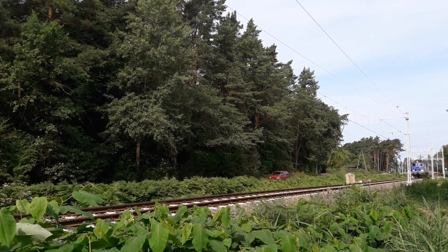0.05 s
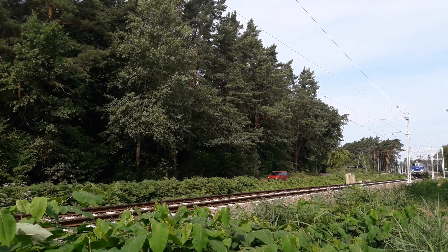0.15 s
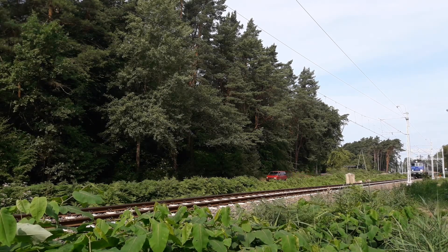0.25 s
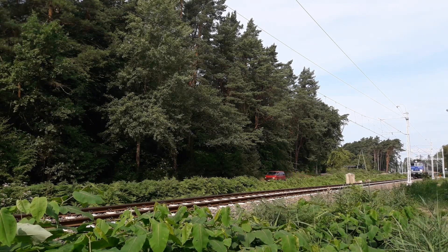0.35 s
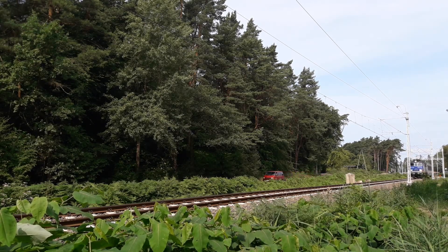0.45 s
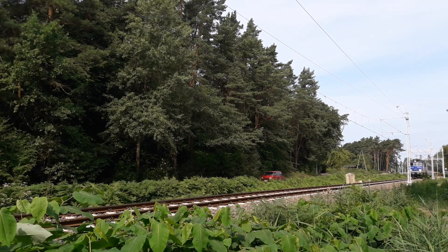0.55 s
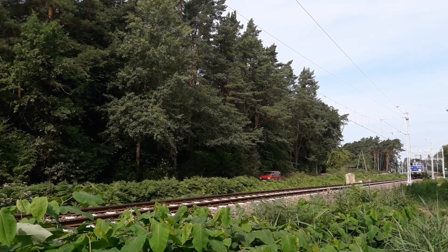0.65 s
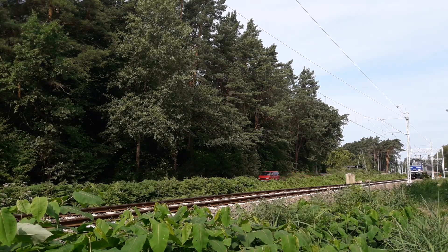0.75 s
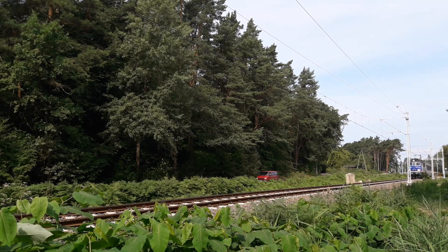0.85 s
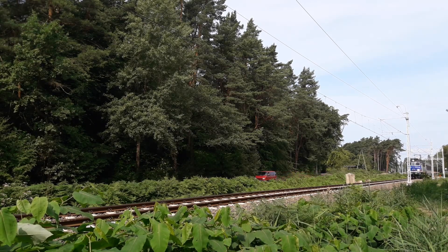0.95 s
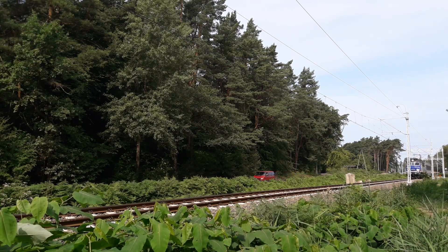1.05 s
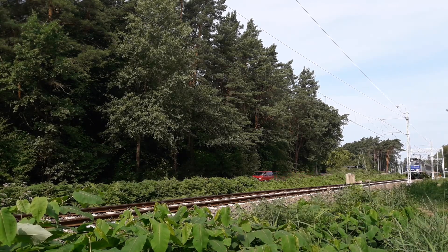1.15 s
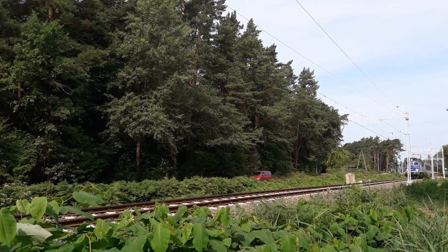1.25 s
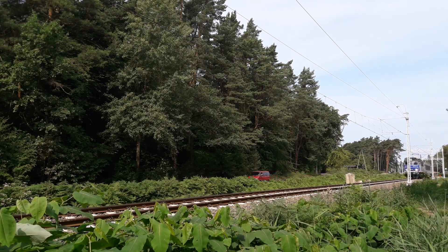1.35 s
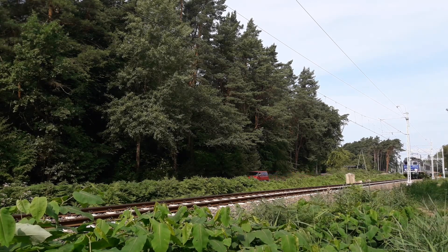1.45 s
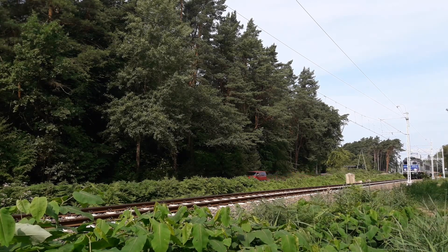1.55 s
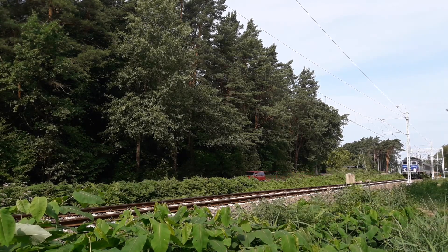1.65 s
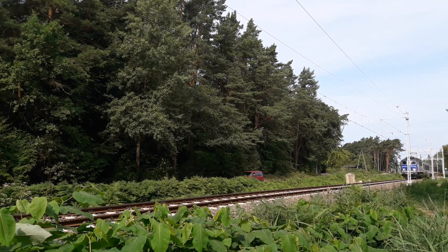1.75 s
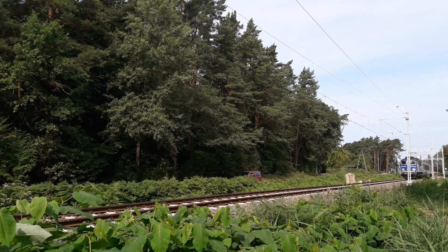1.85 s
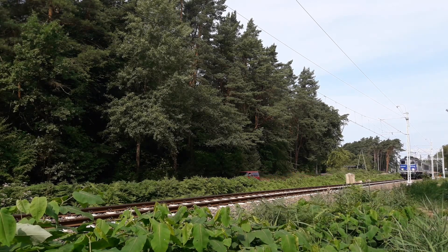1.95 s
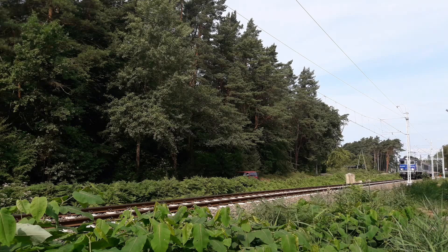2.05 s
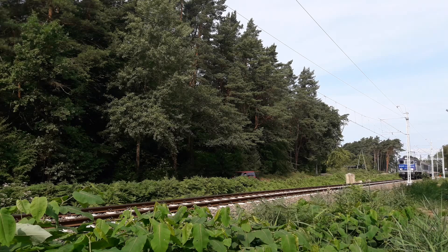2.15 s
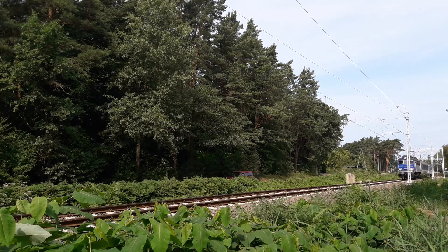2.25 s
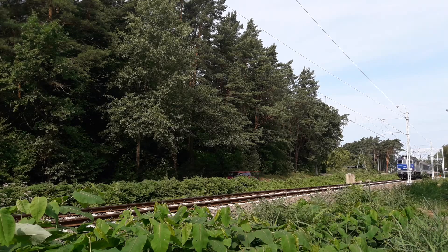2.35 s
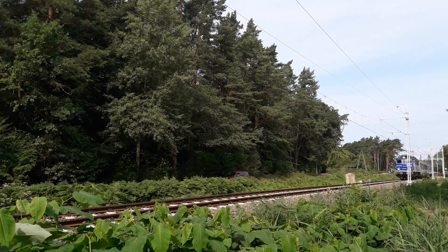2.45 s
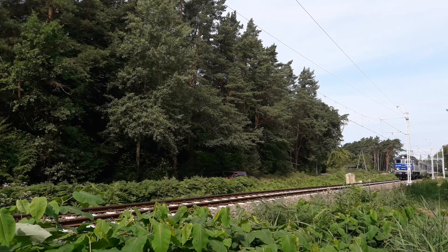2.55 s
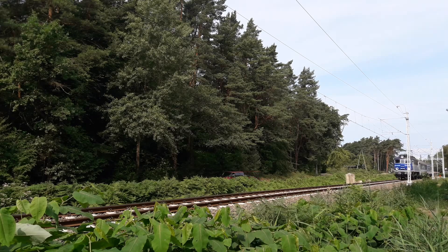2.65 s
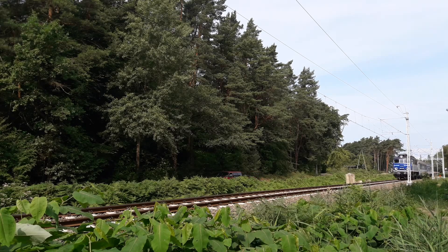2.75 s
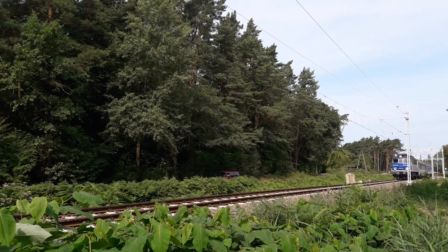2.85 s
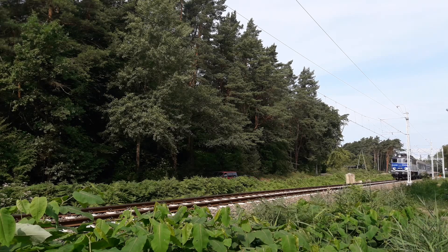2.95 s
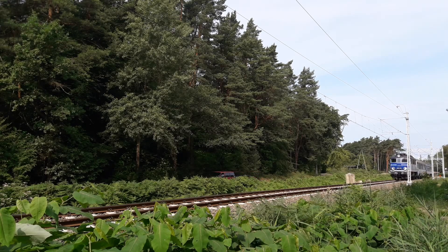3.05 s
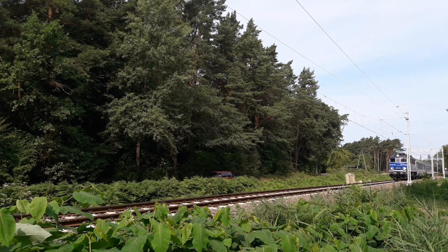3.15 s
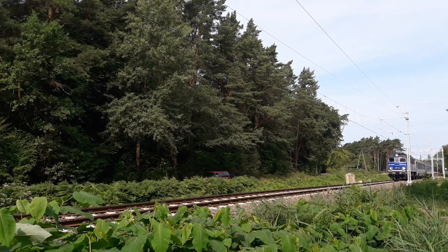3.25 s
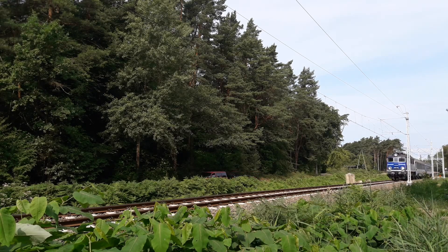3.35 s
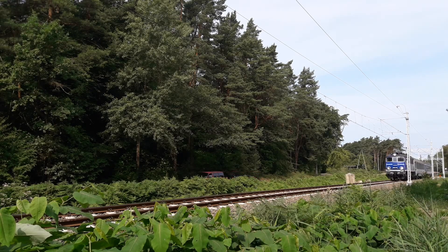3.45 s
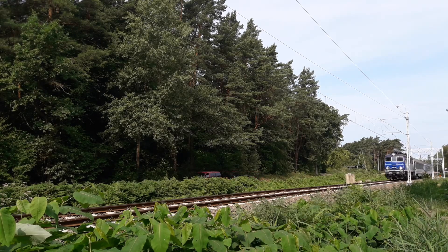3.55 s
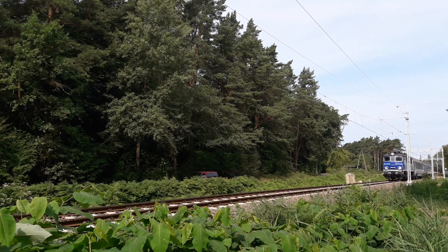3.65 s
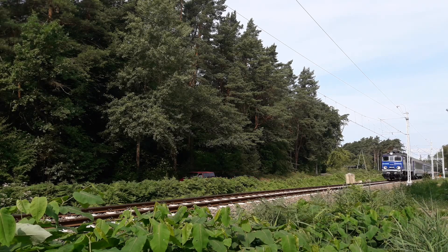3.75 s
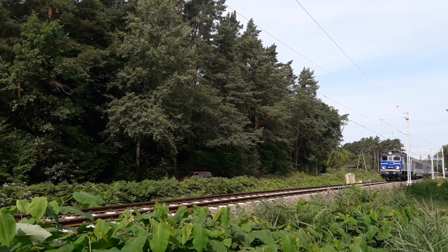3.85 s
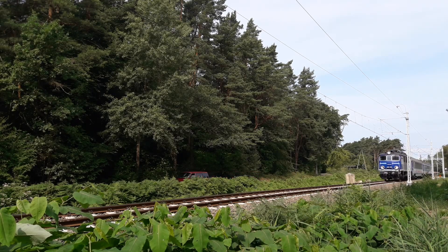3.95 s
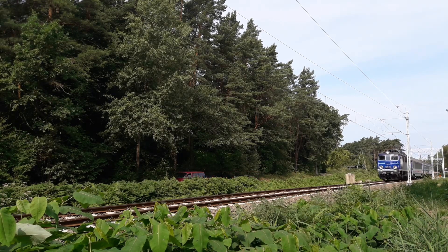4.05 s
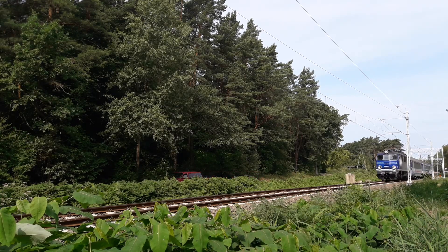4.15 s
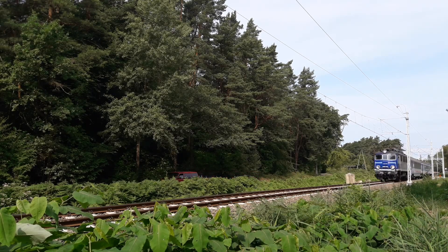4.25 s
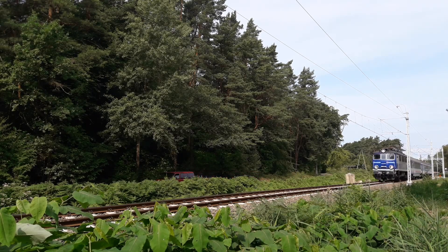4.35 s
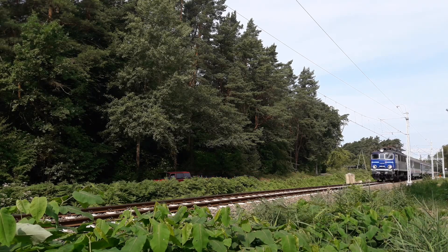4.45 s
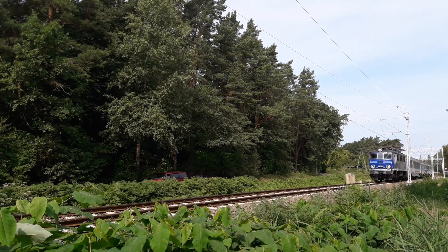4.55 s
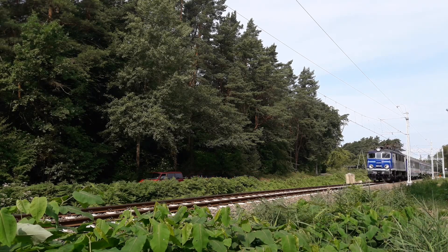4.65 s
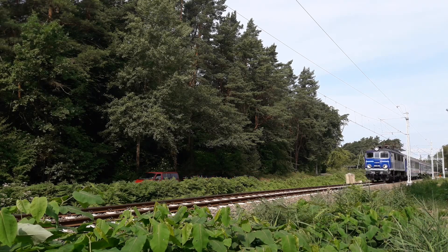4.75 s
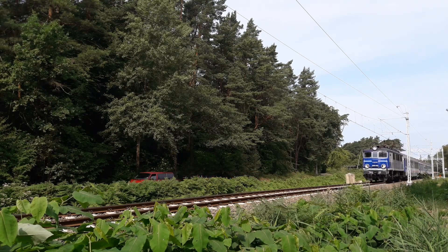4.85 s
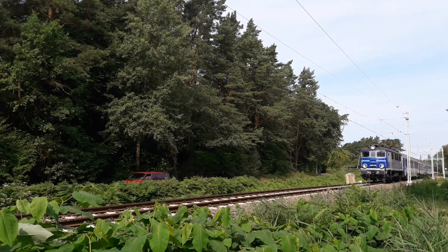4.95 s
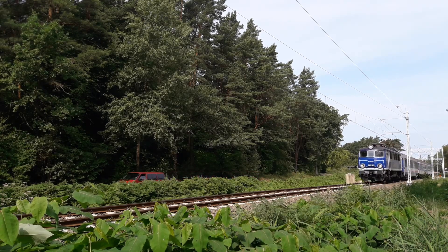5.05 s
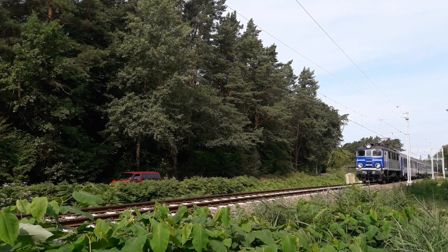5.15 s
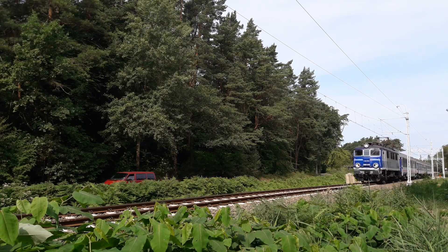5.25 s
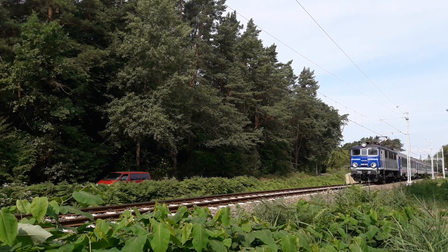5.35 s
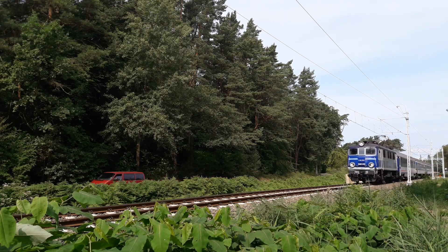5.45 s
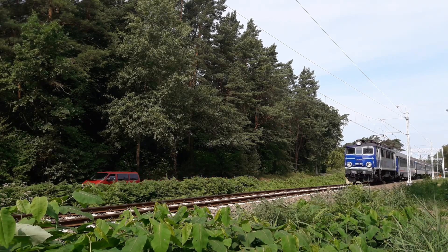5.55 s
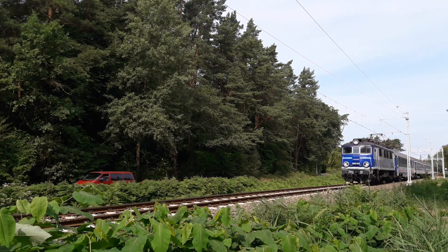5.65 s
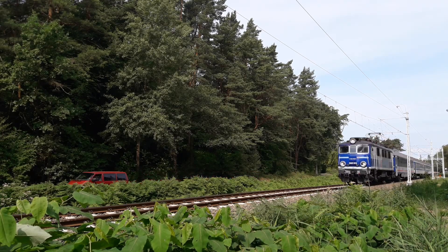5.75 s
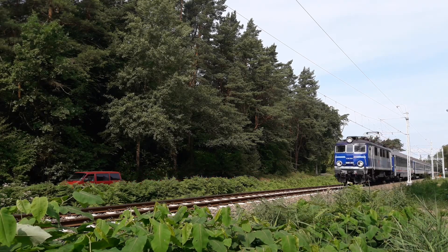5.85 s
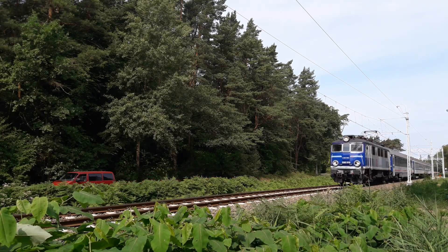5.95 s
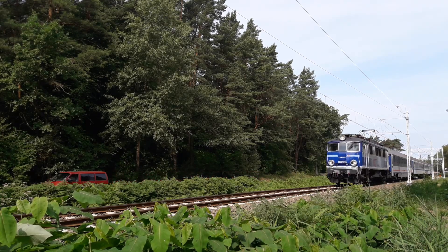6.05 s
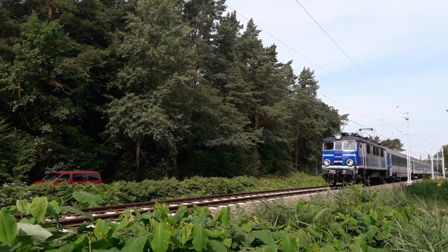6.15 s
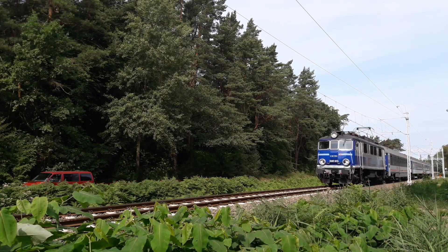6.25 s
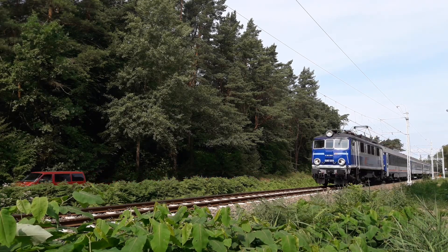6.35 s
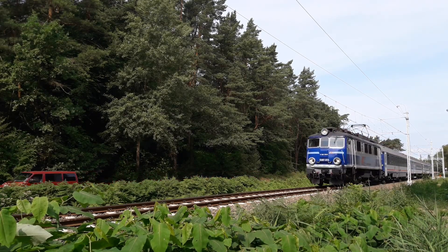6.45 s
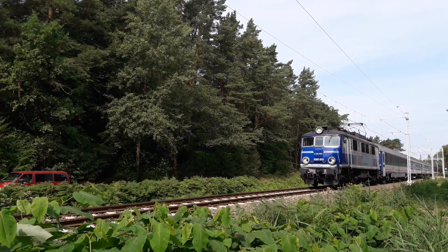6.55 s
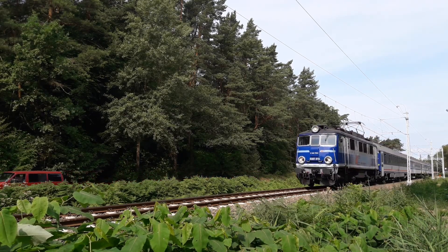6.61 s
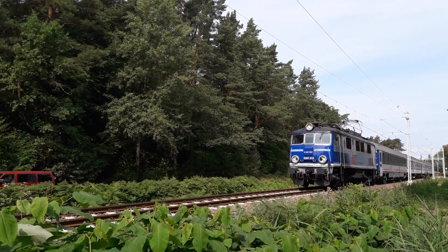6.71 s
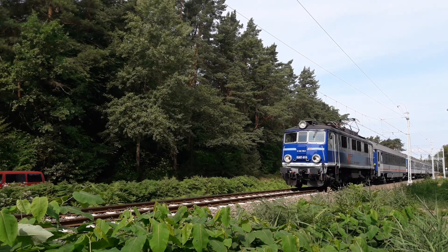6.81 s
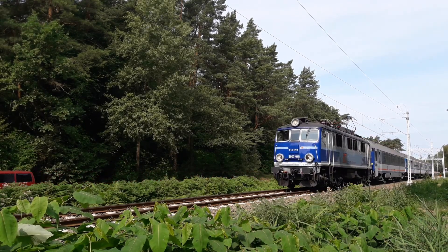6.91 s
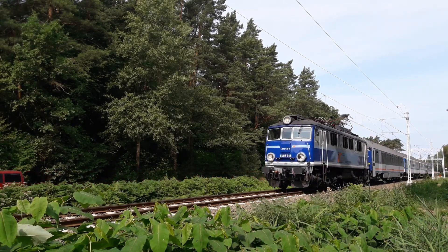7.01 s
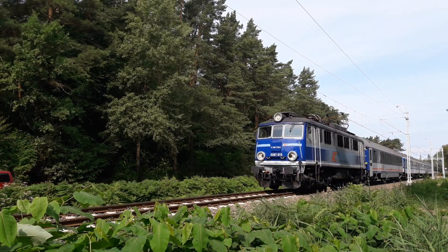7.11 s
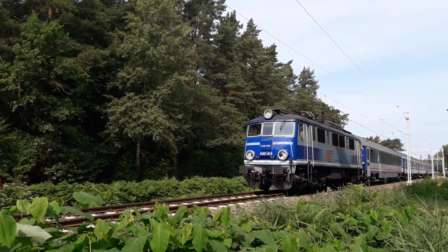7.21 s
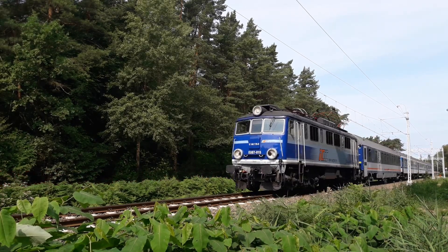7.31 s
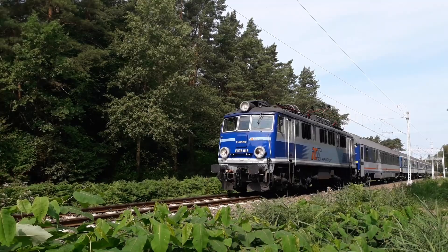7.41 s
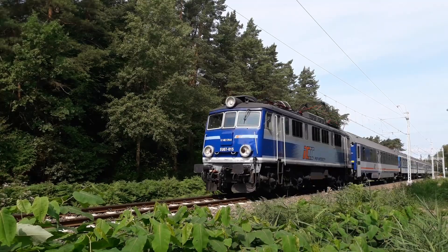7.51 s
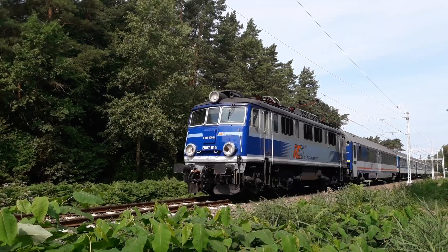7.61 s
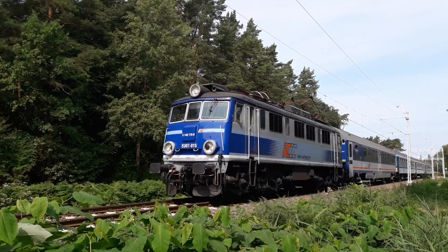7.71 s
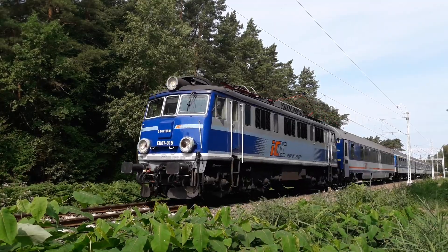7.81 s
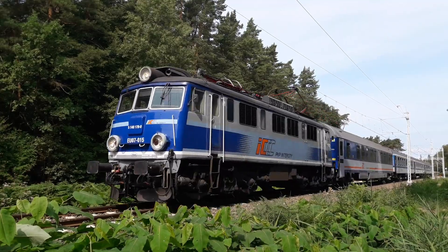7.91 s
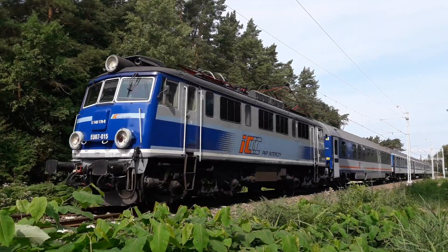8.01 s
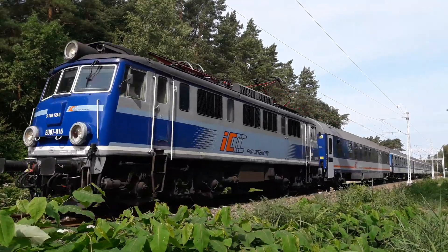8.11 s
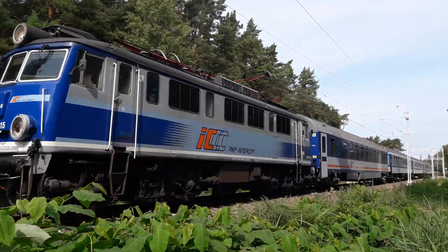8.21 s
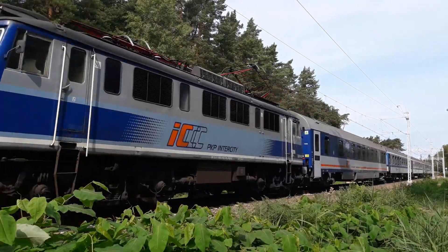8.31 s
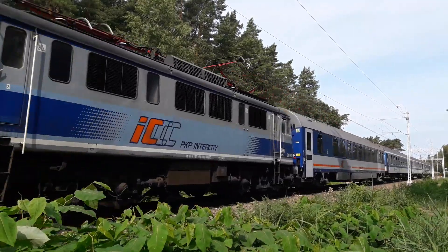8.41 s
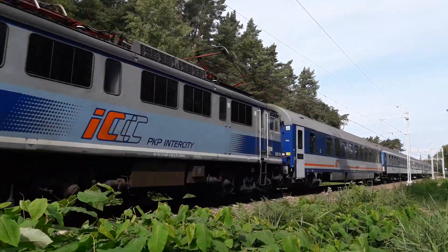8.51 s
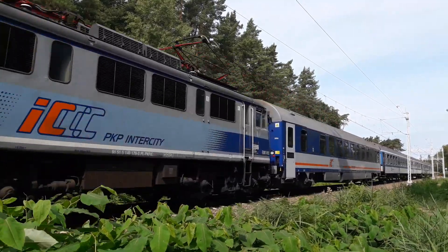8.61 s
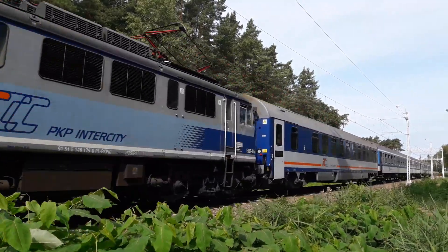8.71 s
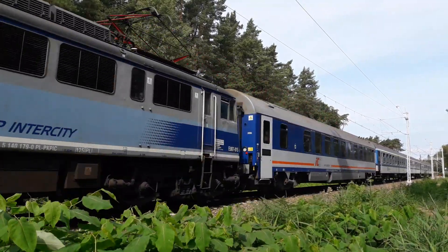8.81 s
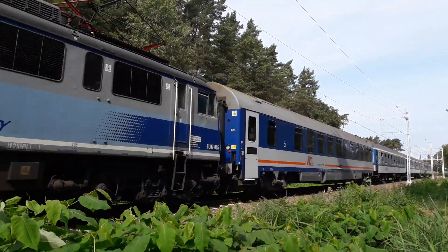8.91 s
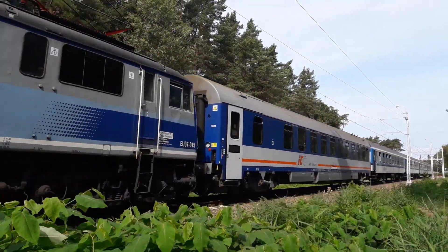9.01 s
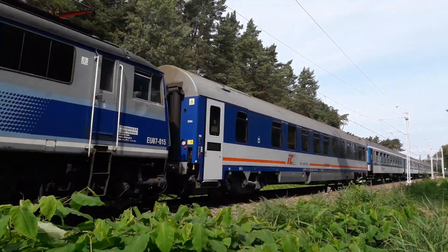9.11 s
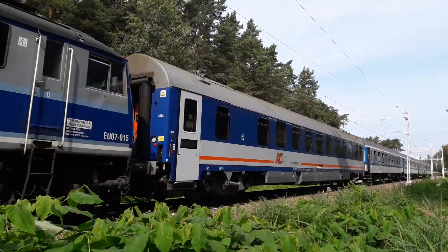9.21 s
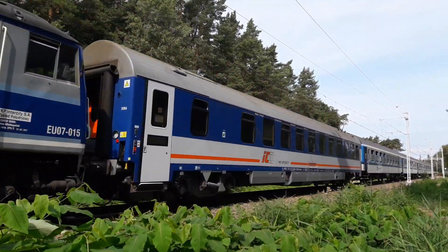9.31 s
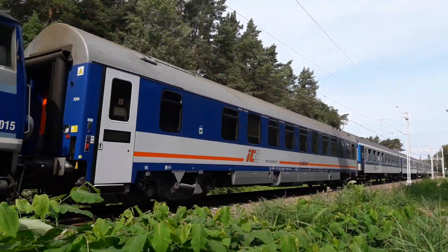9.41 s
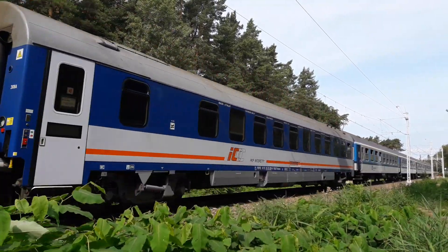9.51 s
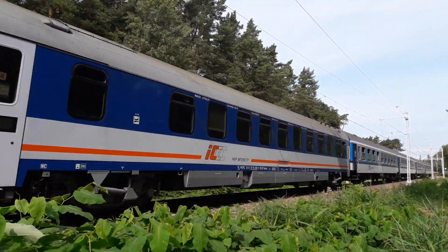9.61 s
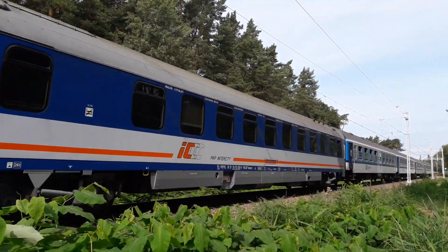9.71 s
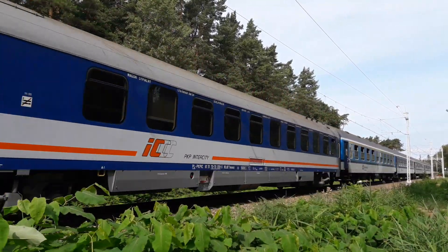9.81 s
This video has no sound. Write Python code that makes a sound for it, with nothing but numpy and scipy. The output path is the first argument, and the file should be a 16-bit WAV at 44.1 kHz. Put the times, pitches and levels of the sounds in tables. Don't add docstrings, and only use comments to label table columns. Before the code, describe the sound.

An electric train approaches along a forest line, from faint ringing rails to a loud roar of wheels, whining gears and hissing cooling air.

```python
import sys
import numpy as np
from scipy import signal
from scipy.fft import rfft, irfft, next_fast_len
from scipy.io import wavfile
from scipy.ndimage import map_coordinates

SR = 44100
rng = np.random.default_rng(int(sys.argv[2]) if len(sys.argv) > 2 else 0)


def boost(x):
    u = np.asarray(x, float) / 20
    return 10 ** u


def bounce(signal):
    frames = np.transpose(np.atleast_2d(signal))
    limited = np.clip(frames, -1, 1)
    pcm = np.round(limited * 32767).astype(np.int16)
    wavfile.write(sys.argv[1], SR, pcm)


N = 435266

# frequency in Hz, level in dB per Hz.
FOREST_SPECTRUM = [(20, -26), (35, -3), (50, 5), (70, -4), (110, -17), (200, -30)]
# frequency in Hz, level in dB per Hz.
PREAMP_SPECTRUM = [(5000, -13), (8000, -0.5), (10500, 0), (12000, 7), (15600, 6)]
# frequency in Hz, level in dB per Hz.
RUMBLE_SPECTRUM = [(26, -61), (36, -43), (44, -22), (52, -10.5), (75, -6), (104, 1.5), (135, -4), (175, -2),
                   (205, -19.5), (280, -23)]
# frequency in Hz, level in dB per Hz.
BOOM_SPECTRUM = [(120, -13.5), (190, 1.5), (270, 4), (340, 3.5), (400, 0), (440, -2.5), (540, 2),
                 (680, -5.5), (1000, -36)]
# frequency in Hz, level in dB per Hz.
ROAR_SPECTRUM = [(380, 3), (600, 1), (850, 2), (1060, 0.5), (1400, -2), (1900, -2.5), (2400, -12),
                 (3200, -53)]
# frequency in Hz, level in dB per Hz.
HISS_SPECTRUM = [(1500, -24), (2400, 3.5), (2950, 3.5), (3600, 0), (4500, -1), (5000, -6.5), (5600, -7.5),
                 (6300, -8.5), (7200, -12), (7700, -24), (8300, -30), (9500, -50)]
# frequency in Hz, level in dB per Hz.
SIZZLE_SPECTRUM = [(7600, -21), (8400, -1.5), (9300, 3), (10500, 2), (11500, 0.5), (12300, 0),
                   (13500, -2.5), (15600, -5)]

# time in seconds, wheels in dB, locomotive body in dB.
APPROACH = [(0, -25.5, -27.5), (.6, -26.5, -27), (1.8, -24, -25), (3, -22, -22.5), (4.2, -18.5, -19.5),
            (5.4, -14.5, -16), (6.2, -12.5, -13), (7, -9.5, -9.5), (7.5, -6.5, -6.5), (8, -2.5, -2),
            (8.3, -2.5, 0), (8.9, -1.5, 0), (9.3, 1, 0), (9.5, .3, -.6), (9.68, 0, -4.5), (9.87, 0.5, -4.5)]
# time in seconds, first dip in Hz, echo share from 0 to 1.
GROUND_ECHO = [(0, 2620, 0.16), (5.5, 2730, 0.13), (7, 3200, 0.33), (8, 2810, 0.53), (8.6, 2680, 0.63),
               (9.2, 2620, 0.51), (9.6, 2070, 0.3), (9.87, 1840, 0)]
# centre in seconds, spread in seconds, rumble in dB, boom in dB, roar in dB.
ROUGH_RAIL = [(3.05, 0.28, 5, 0.5, -0.5), (3.6, .06, 2, 2.5, 2), (5.38, .06, 1.5, -1.5, 0),
              (5.9, 0.071, 2.5, 2, 0.5), (6.42, .07, 1.5, 2, -1.5), (7.0, .07, 5, 2, 0),
              (7.55, .08, 2, 3.5, -0.5), (7.75, 0.12, 0, 1, -0.5), (8.35, 0.053, 2.5, -2, -0.5),
              (8.77, .05, -0.5, -0.5, 0), (9.15, 0.037, 0, -0.5, 1.5), (9.461, 0.074, 2.5, 1, 0.5),
              (9.75, 0.092, -0.5, 1.5, -1.5)]
# frequency in Hz, width in Hz, level in dB.
RAIL_RESONANCES = [(710, 134, -1), (766.5, 32, -9.5), (842.5, 71, -5.5), (952, 72, -5.5), (1144, 100, -7),
                   (1208, 44, -1.5), (1285, 38, -7.5), (1346, 74, -4), (552, 89, -10.5)]

# time in seconds, mesh pitch in Hz.
MESH_PITCH = [(0, 233), (2, 234.5), (3.7, 238.3), (5, 241.8), (6.3, 247), (7, 249), (7.7, 253), (8.2, 253),
              (8.6, 251), (9.1, 248), (9.4, 247), (9.87, 249)]
# time in seconds, first order in dB.
GEAR_EFFORT = [(0, -55), (1.5, -50), (3.1, -49.5), (3.4, -42.5), (4.5, -36), (5.3, -34.5), (5.75, -33),
               (6.3, -29.5), (7, -30.5), (7.5, -27), (8.1, -23), (8.3, -13.5), (8.8, -13), (9.1, -10.5),
               (9.3, -15.5), (9.65, -13.5), (9.87, -12)]
# multiple of the mesh pitch, peak in seconds, spread in seconds, level in dB.
HIGH_ORDERS = [(6, 8.24, 0.68, -33.5), (7, 8.32, 1, -33), (9, 7.2, 0.97, -45.5), (5, 19, 0.7, -50.5)]
# peak in seconds, spread in seconds, order, level in dB.
AXLES_IN_STEP = [(7.16, 0.025, 1, -23.5), (6.13, .04, 2, -34.5), (6.36, 0.026, 2, -32),
                 (7.07, 0.01, 2, -27), (7.77, 0.079, 2, -23.5), (8.03, 0.056, 2, -23), (8.38, .06, 2, -21),
                 (8.16, 0.035, 2, -22), (8.68, 0.055, 2, -21), (8.85, 0.054, 2, -23), (9.46, 0.013, 2, -15),
                 (9.6, 0.017, 2, -21.5), (7.82, 0.049, 3, -23.5), (8.21, 0.044, 3, -26),
                 (8.55, 0.043, 3, -30.5), (8.86, 0.082, 3, -29), (9.2, 0.076, 3, -33), (8.92, .05, 6, -29),
                 (9.76, 0.067, 6, -30)]
# centre in seconds, spread in seconds, order, depth from 0 to 1.
AXLES_OPPOSED = [(7.24, 0.022, 1, .9), (7.88, 0.02, 1, 0.6), (8.02, 0.014, 1, 0.4), (8.1, .02, 1, 0.9),
                 (8.85, 0.016, 1, 1), (9.2, .015, 1, .5), (9.27, .02, 1, 0.5), (9.36, 0.017, 1, 0.8),
                 (9.53, 0.047, 1, 0.54), (9.79, .025, 1, 0.86), (6.15, 0.023, 1, .8), (6.0, 0.019, 1, 0.5),
                 (5.8, 0.045, 1, 0.7), (6.84, 0.023, 1, .7), (7.93, 0.017, 2, 0.5), (8.94, .03, 2, 0.57),
                 (9.38, 0.024, 2, 0.3), (5.6, 0.052, 1, 0.5), (6.55, .03, 1, 0.3), (8.22, 0.018, 2, 0.66),
                 (8.49, 0.015, 2, 0.75), (8.6, 0.017, 2, 0.4), (9.64, .015, 2, 0.8)]

# peak in seconds, spread in seconds, frequency in Hz, width in Hz.
WHISTLES = [(6.95, .35, 404, 8), (9.57, .07, 330, 70), (9.15, .4, 880, 40), (9.2, .6, 1515, 45),
            (8.75, .2, 2850, 450), (9.45, .15, 2920, 300), (7.7, .3, 3790, 40), (9.75, .12, 2350, 350),
            (7.0, .7, 4500, 220), (8.45, .22, 4310, 90), (7.4, .3, 7300, 500), (6.2, .3, 6500, 1200),
            (7.3, .15, 11090, 300), (7.95, .2, 10500, 1100), (8.1, .17, 13240, 320), (7.85, .2, 14200, 900),
            (9.38, .1, 11600, 900), (8.8, .2, 12900, 500), (7.65, .17, 760, 260), (5.6, .6, 482, 22),
            (9.8, .08, 390, 120)]
WHISTLE_LEVELS = [-33, -20, -29, -26.5, -29.5, -30.5, -45, -31, -48.5, -34, -51, -55.5, -64, -59, -62, -66,
                  -61, -65, -27, -39.5, -25.5]
# time in seconds, peak in dB.
SPARKS = [(6.8308, -57), (7.1455, -53), (7.3192, -50), (7.7676, -43), (7.9782, -42), (8.165, -42),
          (8.838, -42), (8.93, -43), (9.37, -43)]
# start in seconds, frequency in Hz, level
# in dB, decay by 60 dB in seconds.
KNOCKS = [
    (.383, 130, -23, .055),
    (5.5125, 860, -13, .04),
    (5.5125, 700, -22, .04),
    (5.514, 530, -27, .1),
    (5.513, 1250, -24, .04),
]
# frequency in Hz, starting level in dB, decay by 60 dB in seconds.
HORN_PARTIALS = [(745, -33, 2.2), (1520, -42.5, 1.5), (2290, -59, 1.5), (3042, -63, 1.5)]
# peak in seconds, spread in seconds, level in dB.
TREE_ANSWERS = [(.02, .06, -1), (.16, 0.032, 2.5), (.28, 0.054, 2), (.54, 0.054, 8), (.75, .05, 5)]


def rms_one(x):
    return x / np.sqrt(np.mean(x ** 2) + 1e-20)


def in_time(rows):
    s, *columns = np.transpose(rows)
    return [np.interp(np.arange(N) / SR, s, c) for c in columns]


def drift(rate_hz):
    r = np.exp(-80 * np.pi * rate_hz / SR)
    slow = signal.lfilter([1], [1, -2 * r, r * r], rng.standard_normal(N // 40 + 3002))[3000:]
    return np.interp(np.arange(N) / 40, np.arange(len(slow)), rms_one(slow))


def coloured(spectrum, flicker_db):
    size = next_fast_len(N)
    hz = np.arange(size // 2 + 1) * SR / size + 1
    knots, db = np.transpose(spectrum)
    gain = boost(np.interp(np.log(hz), np.log(knots), db, left=-90, right=-90))
    noise = irfft(rfft(rng.standard_normal(size)) * gain, size)[:N]
    return rms_one(noise * boost(flicker_db * drift(5.5)))


def narrow(hz, width_hz):
    r = np.exp(-np.pi * width_hz / SR)
    section = [1, 0, -1, 1, -2 * r * np.cos(2 * np.pi * hz / SR), r * r]
    noise = rng.standard_normal(N + SR)
    return rms_one(signal.sosfilt([section, section], noise)[SR:])


def swell(at_s, spread_s):
    out = np.zeros(N)
    ends = ((at_s + spread_s * np.array([-5, 5])) * SR).astype(int)
    near = np.arange(*np.clip(ends, 0, N))
    out[near] = np.exp(-.5 * ((near / SR - at_s) / spread_s) ** 2)
    return out


def tone(hz, wobble):
    return np.sqrt(2) * np.sin(2 * np.pi * np.cumsum(hz) / SR + wobble * drift(7.4))


def follow(near_db, abreast_db, share):
    return boost(abreast_db + share * near_db)


def ground_echo(x):
    dip_hz, share = in_time(GROUND_ECHO)
    dull = np.convolve(x, np.hanning(7) / 3, "same")
    late = map_coordinates(dull, [np.arange(N) - SR / dip_hz], order=3)
    return x - np.clip(share, 0, .95) * late


def forest():
    return boost(-56.5) * coloured(FOREST_SPECTRUM, flicker_db=1.5)


def horn_echo():
    t = np.arange(N) / SR
    answers = sum(boost(db) * swell(s, spread) for s, spread, db in TREE_ANSWERS)
    ringing = np.zeros(N)
    for hz, db, t60 in HORN_PARTIALS:
        order = hz / HORN_PARTIALS[0][0]
        level_db = db - 60 * t / t60 + 1.2 * order * drift(15.0)
        ringing += boost(level_db) * tone(np.full(N, hz), wobble=0.35 * order)
    return answers * ringing


def knocks():
    out = np.zeros(N)
    t = np.arange(SR // 4) / SR
    for s, hz, db, t60 in KNOCKS:
        at = round(s * SR)
        onset = np.minimum(t * hz, 1)
        out[at:at + len(t)] += boost(db - 60 * t / t60) * onset * np.sin(2 * np.pi * hz * t)
    return out


def whistles():
    out = np.zeros(N)
    for (s, spread, hz, width_hz), db in zip(WHISTLES, WHISTLE_LEVELS):
        chatter_db = 4 * hz / 12000 * drift(20)
        out += boost(db + chatter_db) * swell(s, spread) * narrow(hz, width_hz)
    return out


def collector():
    _, body_db = in_time(APPROACH)
    flares = sum(boost(db - 16) * swell(s + .005, .005) for s, db in SPARKS)
    roof_db = 2.5 * swell(8.1, .35)
    steady = follow(body_db, abreast_db=-54.5, share=1) * boost(roof_db + .6 * drift(14.0))
    return (steady + flares) * coloured(SIZZLE_SPECTRUM, flicker_db=1.0)


def blower():
    t = np.arange(N) / SR
    shown_s, rise_s, fade_s = 8.78, 0.14, 9.3
    facing = np.clip((t - shown_s) / rise_s, 0, 1)
    fade_db = 18.5 * np.maximum(t - fade_s, 0)
    db = -19 - fade_db + 3.0 * drift(14.0)
    pitch_hz = 214.8 + 5 * (t - shown_s)
    return facing * boost(db) * tone(pitch_hz, wobble=0.17)


def rails():
    t = np.arange(N) / SR
    damping_db = 11 * np.maximum(t - 7.25, 0)
    song_db = -37 + 0.1435 * t ** 2 - damping_db
    song = sum(boost(db) * narrow(hz, width_hz) for hz, width_hz, db in RAIL_RESONANCES)
    return boost(song_db) * rms_one(song)


def rolling():
    wheels_db, body_db = in_time(APPROACH)
    rough = boost(sum(np.outer(db, swell(s, spread)) for s, spread, *db in ROUGH_RAIL))
    rumble = follow(wheels_db, abreast_db=-28, share=0.85) * rough[0]
    rumble = rumble * coloured(RUMBLE_SPECTRUM, flicker_db=1.6)
    boom = follow(wheels_db, abreast_db=-18, share=1.163) * rough[1]
    boom = boom * coloured(BOOM_SPECTRUM, flicker_db=1.47)
    roar = follow(wheels_db, abreast_db=-21, share=0.82) * rough[2]
    roar = roar * coloured(ROAR_SPECTRUM, flicker_db=0.63)
    hiss = follow(body_db, abreast_db=-26.5, share=1.019) * coloured(HISS_SPECTRUM, flicker_db=0.62)
    return rumble + boom + ground_echo(roar + hiss)


def gears():
    t = np.arange(N) / SR
    mesh_hz, = in_time(MESH_PITCH)
    effort_db, = in_time(GEAR_EFFORT)
    _, body_db = in_time(APPROACH)

    beat = np.cos(2 * np.pi * 6.25 * (t - 3.9))
    worn = .65 * swell(4.5, 1.1)
    beating = np.sqrt(1 + worn ** 2 + 2 * worn * beat)

    level = {
        1: boost(effort_db + 1.16 * drift(17.0)) * beating,
        2: follow(body_db, abreast_db=-23.5, share=1.19) * boost(4.2 * drift(12.0)),
        3: follow(body_db, abreast_db=-32, share=0.85) * boost(4.7 * drift(8.4)),
        6: 0,
    }
    for s, spread, order, db in AXLES_IN_STEP:
        k = round(order)
        level[k] = level[k] + boost(db) * swell(s, spread)
    for s, spread, order, depth in AXLES_OPPOSED:
        k = round(order)
        level[k] = level[k] * (1 - np.clip(depth, 0, 1) * swell(s, spread))

    howl = np.zeros(N)
    for k, gain in level.items():
        howl += gain * boost(1.16 * drift(21.0)) * tone(k * mesh_hz, wobble=0.4 * k)
    for k, s, spread, db in HIGH_ORDERS:
        howl += boost(db + 4.5 * drift(26.0)) * swell(s, spread) * tone(k * mesh_hz, wobble=.5 * k)
    return howl


def scene():
    surroundings = forest() + horn_echo() + knocks()
    train = whistles() + collector() + blower() + rails() + rolling() + gears()
    return (surroundings + train)[None]


def low_pass(x):
    return signal.sosfilt(signal.butter(12, 15670, fs=SR, output="sos"), x)


def record(dry):
    wet = dry + boost(-73) * coloured(PREAMP_SPECTRUM, flicker_db=1.0)
    rounded = 1.25 * np.tanh(wet / 1.25)
    return low_pass(rounded)


dry = scene()
out = record(dry)
bounce(out)
```